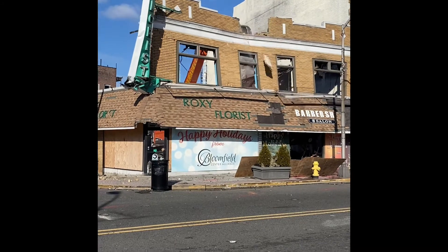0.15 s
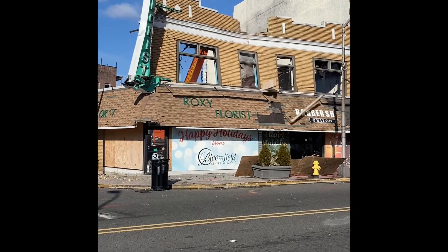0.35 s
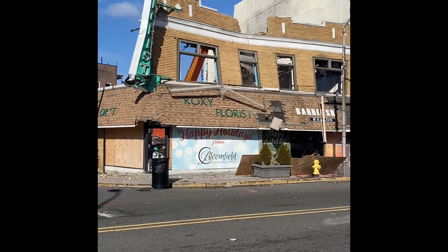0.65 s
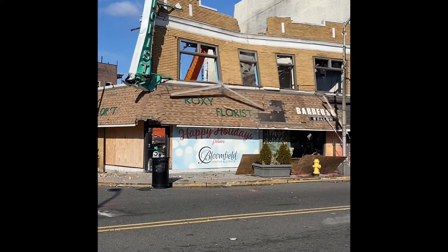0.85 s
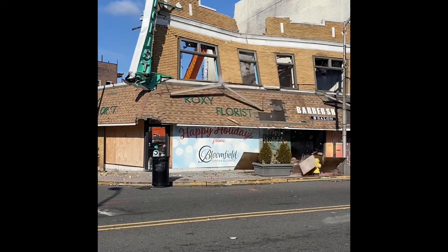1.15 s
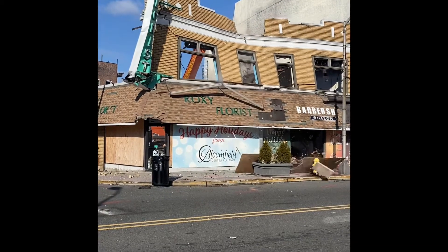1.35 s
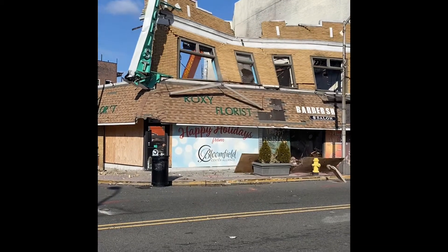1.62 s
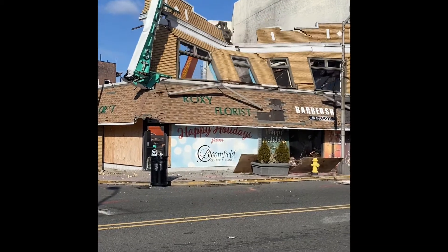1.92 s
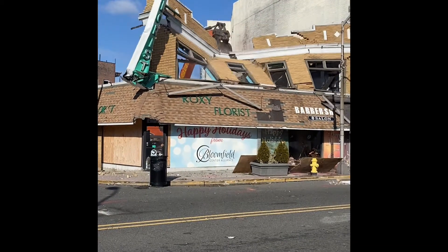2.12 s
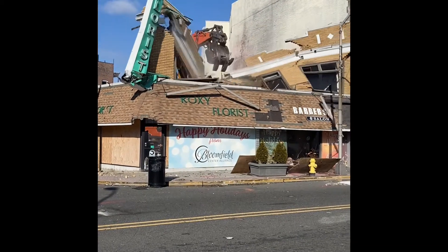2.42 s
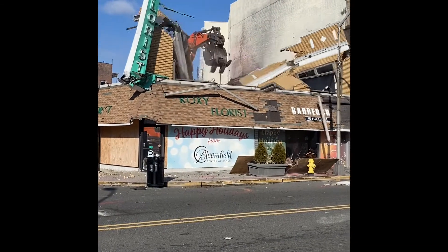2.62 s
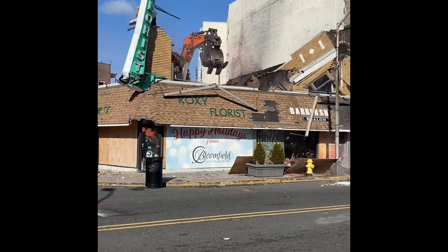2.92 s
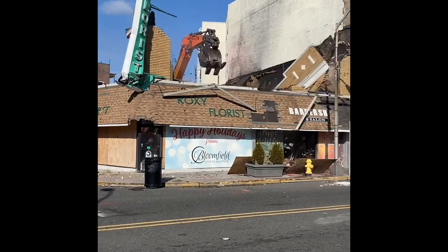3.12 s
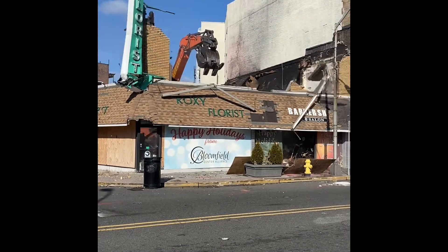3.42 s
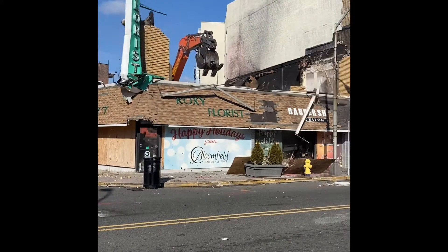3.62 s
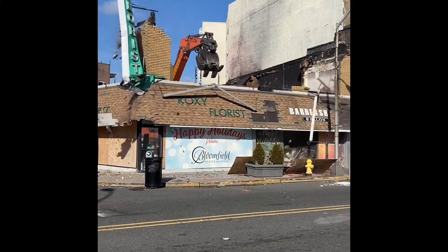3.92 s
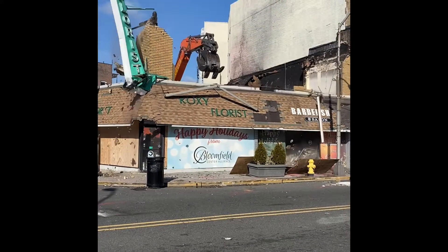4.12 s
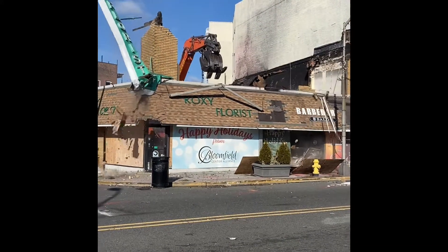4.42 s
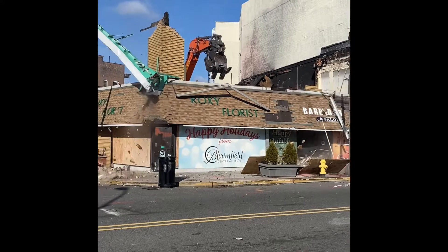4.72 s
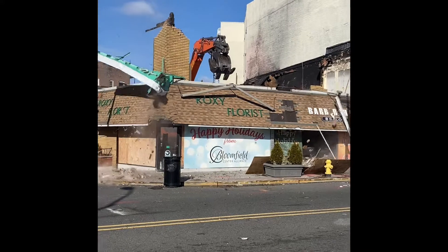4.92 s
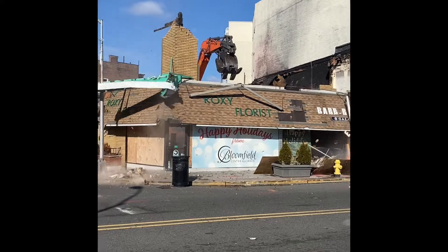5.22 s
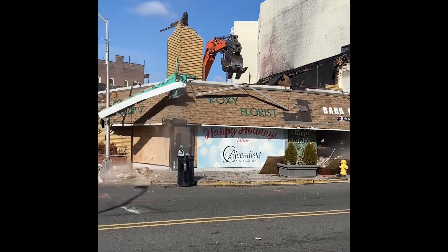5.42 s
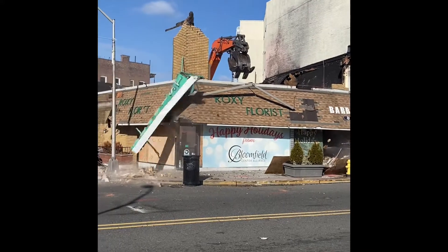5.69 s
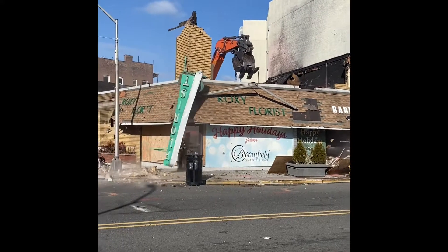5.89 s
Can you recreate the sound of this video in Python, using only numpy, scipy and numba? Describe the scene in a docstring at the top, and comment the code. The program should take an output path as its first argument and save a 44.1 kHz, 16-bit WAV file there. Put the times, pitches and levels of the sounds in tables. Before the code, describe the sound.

Brick building front being torn down across a street: heavy thuds, clattering bricks and timber, shattering glass, pouring rubble, then metal clangs and sudden thinning.

```python
"""Across a street from a building: an excavator pulls down its brick front, heard on a phone.
A narrow drone at the diesel's firing rate and a steady pour of rubble lie beneath everything.
Masonry thuds and rumbles, timbers and bricks knock, and glass and plaster shatter: each broken
piece is a few damped modes. Near the end loose metal parts clang on the pavement as sparse sets of
longer modes, the fall dies down and the bass drains away."""
import sys
import numpy as np
from scipy import signal
from scipy.fft import rfft, irfft, next_fast_len
from scipy.io import wavfile
from scipy.ndimage import uniform_filter1d
from numba import njit

SR = 44100
rng = np.random.default_rng(int(sys.argv[2]) if len(sys.argv) > 2 else 0)


def digitize_waveform(pressure):
    """Quantize a signal to 16-bit integers and store it at the path in sys.argv[1].

    Rows of a 2-D input are taken as channels; values are limited to [-1, 1].
    """
    field = np.atleast_2d(pressure).T
    bounded = np.clip(field, -1, 1)
    quanta = np.round(bounded * 32767).astype(np.int16)
    wavfile.write(sys.argv[1], SR, quanta)


N = 266865
TIME = np.arange(N) / SR
PADDED = next_fast_len(N + SR // 2)
FREQS = np.fft.rfftfreq(PADDED, 1 / SR)


def undb(db):
    """Level is logarithmic in amplitude: decibels to gain."""
    return np.exp(np.asarray(db) * np.log(10) / 20)


def unit(x):
    """Equal mean power makes levels comparable: scale to rms 1."""
    return x / np.sqrt(np.mean(x ** 2))


def at_hz(table, hz):
    """Pitch is logarithmic in frequency: read (frequency [Hz], value) points on a log axis."""
    points, values = np.transpose(table)
    return np.interp(np.log(hz + 1), np.log(points), values)


def shape(x, response):
    """Linear filtering is multiplication in the spectrum, by a response given at FREQS."""
    return irfft(rfft(x, PADDED) * response, PADDED)[..., :N]


def add(track, s, sound):
    """Superposition: mix a sound into the track at time s [s]."""
    start = max(int(s * SR), 0)
    track[start:start + len(sound)] += sound[:N - start]


def walk(rate):
    """Band-limited fluctuation: random levels held 1 / rate s and slewed; spread near 1."""
    held = rng.standard_normal(1024)[(TIME * rate).astype(int) % 1024]
    return uniform_filter1d(held, int(SR / rate / 2))


@njit
def ring(length, start, hz, t60, size):
    """Modal decay: a sum of damped sines, each a two-pole resonance struck at its own time."""
    out = np.zeros(length)
    for k in range(len(start)):
        turn = 2 * np.pi * hz[k] / SR
        keep = np.exp(-np.log(1000) / (t60[k] * SR))
        pull, drag = 2 * keep * np.cos(turn), keep * keep
        now, before = size[k] * np.sin(turn), 0.
        first = int(start[k] * SR)
        # stop at -48 dB
        for i in range(first, min(length, first + int(.8 * t60[k] * SR))):
            out[i] += now
            now, before = pull * now - drag * before, now
    return out


def pieces(length, start, size, hz, octaves, cycles, count=4):
    """Fragments as resonators: each rings a few scattered modes, for some cycles to -60 dB."""
    chance = rng.uniform(-1, 1, (len(start), count, 3))
    modes = hz * 2 ** (octaves * (chance[..., 0] + chance[..., 1]))
    audible = modes < SR / 2
    push = size[:, None] * np.sign(chance[..., 2]) * np.sqrt(modes / hz) * audible
    t60 = cycles / modes.ravel()
    return ring(length, np.repeat(start, count), modes.ravel(), t60, push.ravel())


def breakup(db, hz, settle_s, octaves, cycles, count):
    """Impact cascade: a blow, then ever weaker fragments; db is the level of the loudest moment."""
    order = np.arange(count) / count
    # stratified exponential delays; the blow itself comes at zero
    late = -np.log(1 - order - rng.random(count) * (order > 0) / count)
    burst = pieces(SR // 4, abs(settle_s) * late, np.exp(-.3 * late), hz, octaves, cycles)
    loudest = np.sqrt(uniform_filter1d(burst ** 2, size=512).max())
    return undb(db) * burst / loudest


def engine():
    """Periodic firing: the diesel drones unevenly behind the wall; only its firing rate gets through."""
    firing_hz = 74.7 * (1 + 0.089 * walk(25))
    phase = 2 * np.pi * np.cumsum(firing_hz) / SR
    rough_db = 2.5 * walk(18)
    return undb(-33.5) * unit(np.sin(phase) * undb(rough_db))


def echoes(scatter_db, scatter_s, tail_db):
    """Reverberation: quick scatter off the ground and shop fronts, and a duller decaying tail."""
    t60_s, dull_hz = 0.42, 4900  # decay time of the tail; corner above which it is dulled
    t = TIME[:SR // 2]
    early, late = rng.standard_normal((2, len(t)))
    scatter = early * np.exp(-t / scatter_s) * (t > .003)
    dull = signal.sosfilt(signal.butter(1, dull_hz, fs=SR, output="sos"), late)
    tail = dull * np.exp(-np.log(1000) * t / t60_s)
    response = undb(scatter_db) * unit(scatter) + undb(tail_db) * unit(tail)
    return rfft(response, PADDED) / np.sqrt(len(t))


def flow():
    """Incoherent powers add: a steady pour plus slides that start fast, run a while and die away."""
    # falling bricks: (time [s], level [dB])
    pour = [(0, -25.5), (1.1, -32.5), (1.75, -32), (2.05, -26.5), (2.5, -30), (2.79, -28.5), (2.98, -23),
            (3.15, -21), (3.5, -21.5), (4.17, -24), (4.33, -27.5), (5.66, -31), (5.8, -38.5), (6.05, -43)]
    # heavy masonry tumbling inside the building: (time [s], level [dB])
    masonry = [(0, -27), (0.35, -29.5), (0.5, -19.5), (2.45, -24), (3.6, -19), (5.08, -20), (5.18, -29.5),
               (5.3, -19), (5.6, -16.5), (5.72, -49), (6.05, -82)]
    # debris breaking loose: (time [s], length before release [s],
    # masonry level [dB], brick level [dB], grit level [dB])
    slides = [(0.01, 0.042, -38, -18.5, -30.5), (0.091, 0.072, -50, -20.5, -31.5),
              (0.382, 0.13, -27, -27, -31), (0.784, 0.15, -21.5, -26, -37.5),
              (1.226, 0.16, -21, -33, -34.5), (1.566, 0.1, -22, -45, -34.5), (3.6, 0.11, -21, -20.5, -28.5),
              (4.544, 0.069, -16, -23.5, -42), (4.886, 0.19, -18.5, -27, -39), (5.39, 0.039, -37, -38, -36),
              (5.558, 0.32, -70, -37.5, -38.5), (5.83, 0.16, -80, -52, -44.5)]
    attack_s, release_s = 0.0048, 0.031  # linear rise; time constant of the decay
    pour_db = np.interp(TIME, *np.transpose(pour))
    masonry_db = np.interp(TIME, *np.transpose(masonry))
    grit_db = -15.5 + 0.84 * pour_db
    power = undb([masonry_db, pour_db, grit_db]) ** 2
    for s, length_s, *levels_db in slides:
        rise = np.clip((TIME - s) / attack_s, 0, 1)
        decay = np.exp(-np.maximum(TIME - s - length_s, 0) / release_s)
        power = power + np.outer(undb(levels_db), rise * decay) ** 2
    return 10 * np.log10(power)


def rubble():
    """Random impacts: all sizes pour in surges; big pieces follow the masonry, small ones the grit."""
    # size classes: (pitch [Hz], level relative to the flow [dB], ringing to -60 dB [cycles])
    sizes = [(67.5, -5.5, 16.4), (137.6, -6, 12.3), (239.3, -9.5, 20.6), (334.4, -9, 23.4),
             (717.4, -6, 21.3), (1340, -6.5, 138), (2588, -9.5, 43), (6015, -1.5, 210), (11860, -5, 290)]
    # how many pieces of each size class fall: (rate [1/s])
    rates = [130, 170, 200, 260, 360, 480, 660, 1200, 1800]
    masonry_db, brick_db, grit_db = flow()
    surge_db, out = walk(24), 0
    for (hz, db, cycles), rate in zip(sizes, rates):
        # shares of the masonry and grit levels at this pitch; bricks take the rest
        heavy = at_hz([(170, 0.93), (650, 0.075)], hz)
        fine = at_hz([(1800, 0.0055), (5500, 0.9)], hz)
        flow_db = heavy * masonry_db + fine * grit_db + (1 - heavy - fine) * brick_db
        when, luck = rng.random((rate * N // SR, 2)).T
        # many small pieces and a few big ones
        size = undb(-(1.0 - 0.3 * heavy) * np.log(luck + 0.016))
        fall = pieces(N, when * N / SR, size, hz, octaves=.75 - 0.21 * heavy, cycles=cycles)
        out = out + unit(fall) * undb(db + flow_db + surge_db)
    return out


def metal(count=7):
    """Modal radiation: a landed part chatters; each touch cracks and rings its modes anew."""
    # modes of four loose parts: (frequency [Hz], relative level [dB], free decay time t60 [s])
    parts = {"bar": [(1821, -1.5, 0.47), (1749, -6, 0.2), (1895, -0.5, 0.15), (2266, -6, 0.29),
                     (2408, -8, 0.3), (2553, -5, 0.24), (2745, -3, 0.11), (3489, 0, 0.17), (3552, -3, 0.12),
                     (3624, -3, 0.28), (5604, -8, 0.42), (5688, -6.5, 0.36), (6029, -7, 0.15),
                     (8258, -14, 0.17)], "pipe": [(1373, 3, 0.56), (921, -5, 0.37), (1458, -2, 0.5),
                                          (1529, -3, 0.3), (1757, -9, 0.5), (1900, -9, 0.5),
                                          (2482, 0, 0.22), (2541, -3, 0.32), (2616, -6, 0.45),
                                          (2683, -4, 0.33), (2767, -3, 0.2), (3177, -9, 0.45),
                                          (4037, -11, 0.24)], "bracket": [(2997, -8.5, 0.31), (3160, -14, 0.2),
                                                                   (3620, -2, 0.061), (3750, 0.5, 0.084),
                                                                   (4240, -1, 0.07), (4470, 0, 0.16),
                                                                   (5200, -3, 0.08), (6100, -8, 0.097),
                                                                   (6100, -1, 0.079), (7000, -6, 0.1),
                                                                   (7740, -12, 0.18)], "rod": [(2140, -1, 0.32),
                                                                                           (2230, -7, 0.2),
                                                                                           (4080, -10, 0.27),
                                                                                           (5650, -1, 0.38)]}
    # landings: (time [s], ringing level [dB], contact crack level [dB],
    # mean time between touches [s], weakening per touch [dB], part)
    metal_hits = [(5.127, -22, -15.5, 0.013, 4.5, "bar"), (5.321, -26.5, -24, 0.016, 3, "pipe"),
                  (5.604, -29.5, -34, 0.0062, 1.5, "bracket"), (5.651, -35, -42, 0.016, 5, "bracket"),
                  (5.719, -30, -34, 0.004, 0, "bracket"), (5.728, -26, -27, 0.004, 6, "bracket"),
                  (5.884, -36, -35, 0.013, 3.5, "rod")]
    jitter, detune_share = 0.22, 0.0177  # unevenness of the touches; shift of the modes
    damping = 0.4  # share of the ring time that the ground takes
    track = np.zeros(N)
    for s, db, crack_db, gap_s, fall_db, part in metal_hits:
        hz, mode_db, t60 = np.transpose(parts[part])
        for touch in range(count):
            detune, sign = rng.uniform(-1, 1, (2, len(hz)))
            bounced = touch > 0  # the first touch is on time, in tune and undamped
            at_s = s + gap_s * (touch + jitter * bounced * rng.uniform(-1, 1))
            push = undb(db + mode_db - fall_db * touch) * np.sign(sign)
            rings_s = t60 * (1 - damping * bounced)
            modes = hz * (1 + detune_share * bounced * detune)
            add(track, at_s, ring(SR // 2, np.zeros(len(hz)), modes, rings_s, push))
            crack = breakup(crack_db - fall_db * touch, 1.9 * hz[0], settle_s=0.0016,
                            octaves=1.35, cycles=93, count=24)
            add(track, at_s, crack)
    return track


def thud(db, hz):
    """Heavily damped impact: a weight lands dully."""
    return breakup(db - 9.0, hz, settle_s=0.00998, octaves=0.575, cycles=15.0, count=6)


def plank(db, hz):
    """Modal excitation: first contact rings all modes of a piece at once, a short hollow clack."""
    # modes of a struck timber or brick: (nominal multiple of its pitch, relative level [dB])
    plank_modes = [(1, 0.5), (1.42, -11.5), (2.13, -10.5), (3.05, -7), (4.3, -22)]
    ratio, mode_db = np.transpose(plank_modes)
    # modes differ from piece to piece
    modes = hz * ratio * (1 + 0.088 * rng.uniform(-0.87, 1, len(ratio)))
    t60 = 25 / np.sqrt(modes * hz)
    return ring(SR // 4, np.zeros(len(modes)), modes, t60, undb(db + mode_db))


def strike(db, hz, settle_s, splinter_db):
    """Brittle fracture: a hard piece clacks and clatters, its edges chip and splinters spray."""
    body = breakup(db - 12.0, hz, settle_s, octaves=0.521, cycles=34.6, count=10)
    chip_db = at_hz([(400, -27.0), (750, -19.0)], hz)  # heavy timbers chip less
    chips = breakup(db + chip_db, 2.65 * hz, settle_s, octaves=0.905, cycles=52, count=14)
    splinters = breakup(splinter_db - 9.5, 5944, settle_s=0.01, octaves=1.2, cycles=340, count=60)
    return plank(db - 10.5, hz) + body + chips + splinters


def crashes():
    """Impact scaling: masonry thuds; timber and brick strike, big pieces also shaking the ground."""
    # heavy masses landing: (time [s], level before the thud's trim [dB], pitch [Hz])
    thuds = [(0.002, -3.5, 81.5), (0.399, -7.5, 118), (0.476, -11, 130), (0.816, -3.5, 200),
             (1.087, -5, 135), (1.398, -7, 175), (1.51, -7, 151), (1.818, -5, 303), (3.595, -7, 140),
             (4.156, -8, 138.5), (4.541, -1, 125), (4.575, -3.5, 170), (4.9, -7, 165), (5.472, -13, 150),
             (5.595, -4.5, 356), (5.643, -14, 328)]
    # timbers and bricks striking: (time [s], level before the layers' trims [dB], pitch [Hz],
    # time constant of the clatter [s], glass and plaster splinters before their trim [dB])
    knocks = [(0.013, -8, 2000, 0.012, -14.5), (0.021, -4.5, 735, 0.0096, -20),
              (0.039, -6.5, 720, 0.0054, -15), (0.053, -10, 696, 0.003, -28),
              (0.106, -3.5, 1360, 0.006, -13), (0.132, -7.5, 1435, 0.004, -32),
              (0.152, -6, 800, 0.00296, -22), (0.166, -13, 1700, 0.006, -27),
              (0.188, -11.5, 773, 0.0041, -18), (0.298, -12.5, 1880, 0.0026, -28),
              (0.312, -11, 2060, 0.0059, -26), (0.326, -4.5, 773, 0.003, -16.5),
              (0.398, -3, 558, 0.0034, -9.5), (0.702, -16, 710, 0.0033, -45),
              (0.81, -11.5, 620, 0.0053, -14), (0.827, -5.5, 742, 0.0074, -16.5),
              (0.9, -14, 1410, 0.01, -29), (1.228, -12.5, 780, 0.01, -26), (1.324, -7.5, 687, 0.0029, -25),
              (1.388, -12, 540, 0.0081, -32), (1.805, -10.5, 600, 0.0027, -44),
              (1.823, -11.5, 676, 0.0039, -26), (1.855, -5, 470, 0.0028, -45),
              (1.943, -15.5, 2050, 0.0051, -43), (2.118, -14, 1210, 0.0096, -20),
              (2.426, -17, 1760, 0.0032, -33), (2.721, -11.5, 1500, 0.0031, -19.5),
              (2.809, -9, 950, 0.0037, -25), (2.877, -14.5, 784, 0.0045, -25),
              (3.04, -14, 1700, 0.0056, -24), (3.135, -9.5, 1130, 0.0053, -13.5),
              (3.147, -6, 930, 0.0031, -15.5), (3.166, -10, 790, 0.005, -17),
              (3.197, -11, 1900, 0.0078, -20), (3.289, -10, 1170, 0.0038, -23),
              (3.498, -12, 830, 0.0033, -22), (3.555, -15, 1430, 0.0094, -15.5),
              (3.648, -9, 1355, 0.0084, -8), (3.68, -13, 1200, 0.0087, -14), (3.872, -14, 1015, 0.005, -21),
              (3.99, -13, 925, 0.0041, -38), (4.058, -8, 604, 0.0048, -22), (4.135, -8, 757, 0.0036, -22),
              (4.158, -3.5, 850, 0.002, -19), (4.419, -14, 805, 0.004, -29),
              (4.498, -14, 1210, 0.0018, -28), (4.529, -9.5, 1230, 0.0022, -20.5),
              (4.592, -8, 560, 0.0065, -17), (4.64, -16, 910, 0.0056, -26),
              (4.897, -13, 746, 0.0081, -17.5), (5.012, -15, 1480, 0.013, -16.5),
              (5.055, -10, 860, 0.0073, -26), (5.537, -18, 1480, 0.0072, -21.5),
              (5.586, -6.5, 471, 0.008, -32), (5.882, -27, 653, 0.005, -29), (6.021, -33, 477, 0.0061, -33)]
    ground_hz, big_piece_hz = 168.4, 610
    out = np.zeros(N)
    for s, db, hz in thuds:
        add(out, s, thud(db, hz))
    for s, db, hz, settle_s, splinter_db in knocks:
        # smaller pieces shake the ground less, by 17 dB per octave
        octaves_above = max(np.log2(hz / big_piece_hz), 0)
        weight_db = -10 - 17 * octaves_above
        add(out, s, strike(db, hz, settle_s, splinter_db) + thud(db + weight_db, ground_hz))
    return out


def scene():
    """Sum and difference stereo: debris falls ahead and to the sides; the street smears and echoes it."""
    # debris at the sides relative to that ahead: (frequency [Hz], level [dB])
    width = [(60, -13.5), (250, -12.5), (650, -7), (1300, -9.5), (2500, -12), (4800, 1.5), (7500, -18),
             (15000, -33)]
    ahead = rubble() + crashes() + metal() + engine()
    aside = shape(rubble() + crashes(), undb(at_hz(width, FREQS)))
    # independent echoes left and right, weaker in the bass
    street = np.array([echoes(scatter_db=-8.5, scatter_s=0.0026, tail_db=-13) for _ in range(2)])
    echo_gain = at_hz([(120, 0.23), (600, 0.72)], FREQS)
    return shape(np.array([ahead + aside, ahead - aside]), 1 + street * echo_gain)


def record(dry):
    """Transducer response: the phone colours and phases the sound; the bass drains away at the end."""
    # colour of the microphone: (frequency [Hz], gain [dB])
    mic = [(20, -21), (36, -12.5), (55, 2.5), (120, 3), (200, 3), (400, 1.5), (780, 4), (1200, 2),
           (2000, 5), (3000, 1.5), (4200, 0), (5200, -3), (7000, 0), (15500, -3)]
    # phase by which the left port leads the right: (frequency [Hz], phase [rad])
    ports = [(0, 0), (2200, 0), (3000, .9), (4500, .3), (7000, 0), (9050, -3.1), (11100, -6.3),
             (13200, -9.4), (15200, -12.6)]
    fade_s, fade_constant_s, bass_hz = 5.62, 0.022, 290  # onset, time constant, corner of the bass cut
    top_hz = 16000
    lead = np.interp(FREQS, *np.transpose(ports))
    x = shape(dry, undb(at_hz(mic, FREQS)) * np.exp(.5j * np.array([lead, -lead])))
    thin = signal.sosfilt(signal.butter(6, bass_hz, "high", fs=SR, output="sos"), x)
    bass = np.exp(-np.maximum(TIME - fade_s, 0) / fade_constant_s)
    x = np.tanh(bass * x + (1 - bass) * thin)  # soft saturation
    return signal.sosfilt(signal.ellip(8, .2, 80, top_hz, fs=SR, output="sos"), x)


dry = scene()
out = record(dry)
digitize_waveform(out)
```